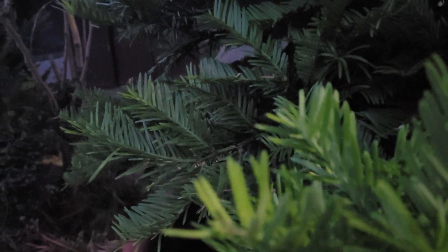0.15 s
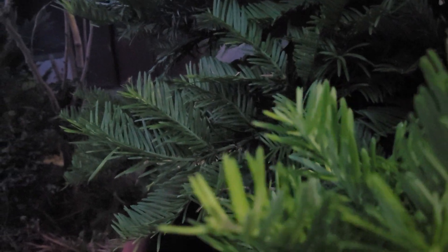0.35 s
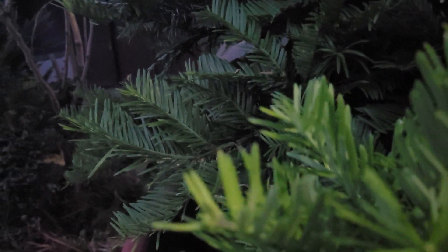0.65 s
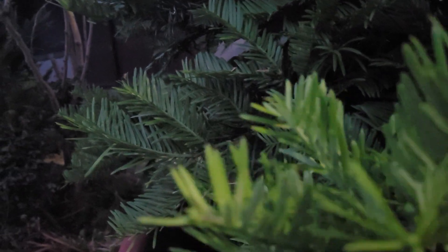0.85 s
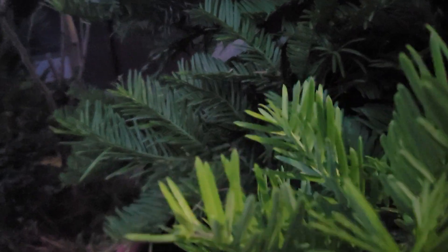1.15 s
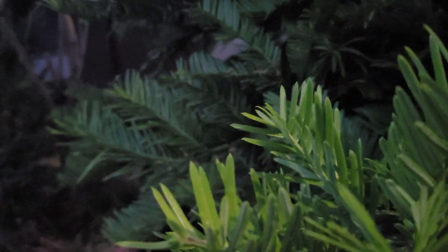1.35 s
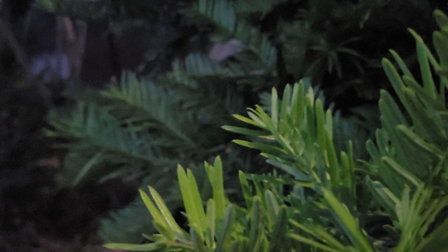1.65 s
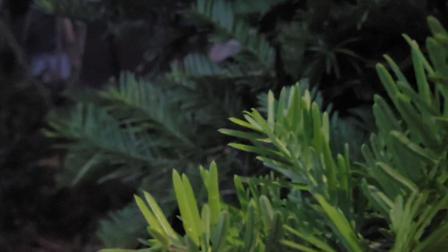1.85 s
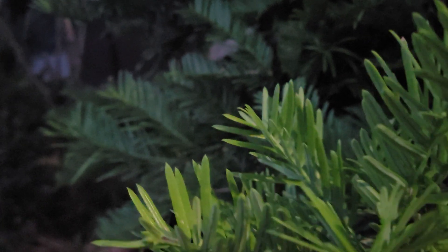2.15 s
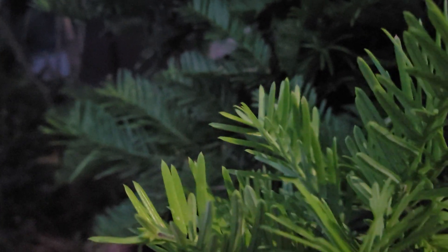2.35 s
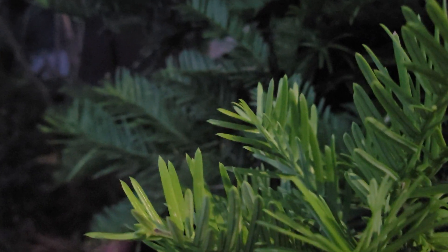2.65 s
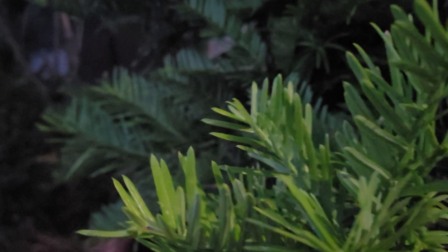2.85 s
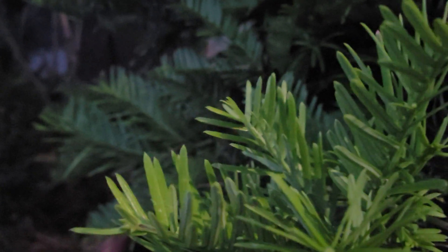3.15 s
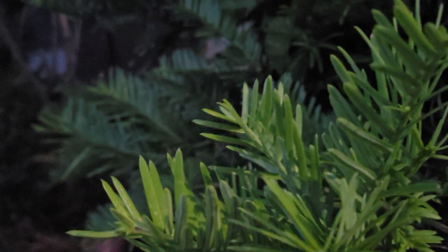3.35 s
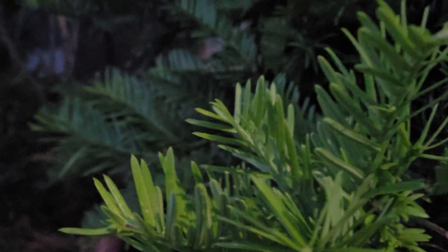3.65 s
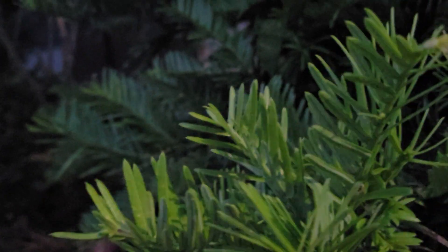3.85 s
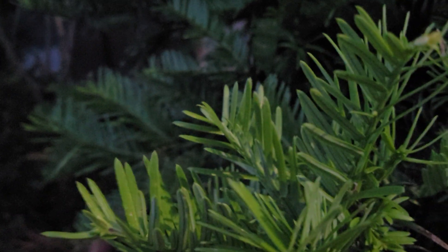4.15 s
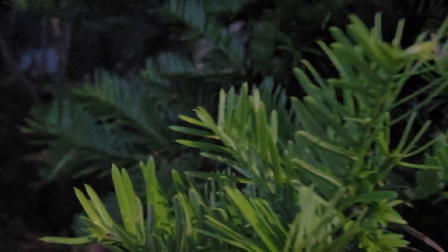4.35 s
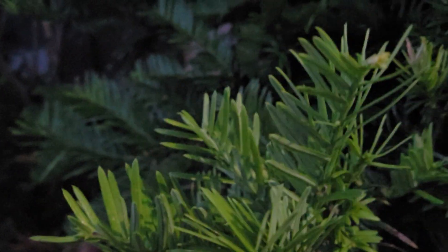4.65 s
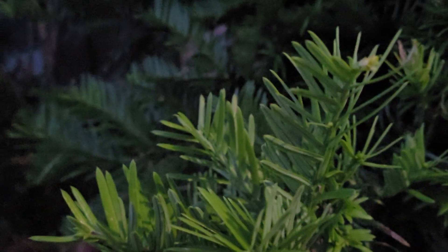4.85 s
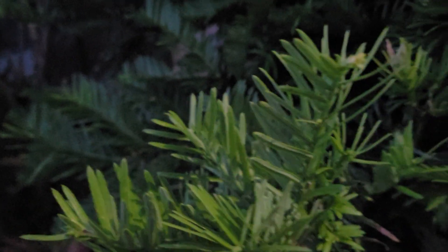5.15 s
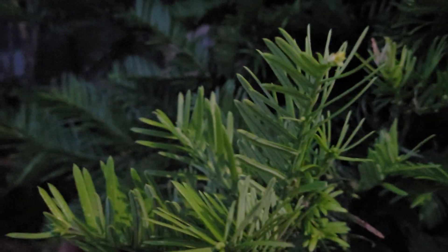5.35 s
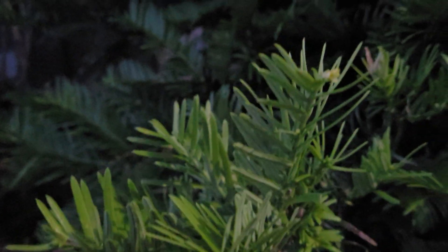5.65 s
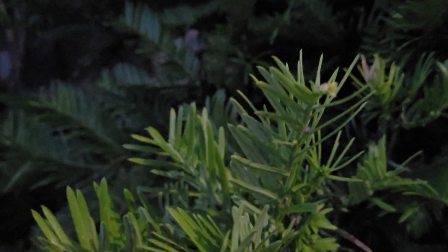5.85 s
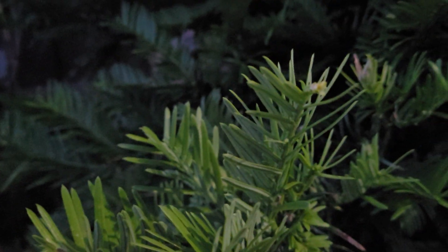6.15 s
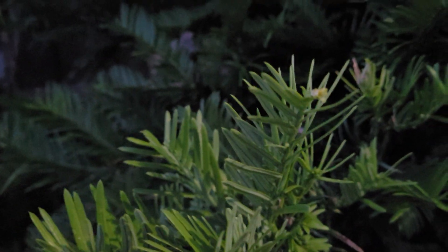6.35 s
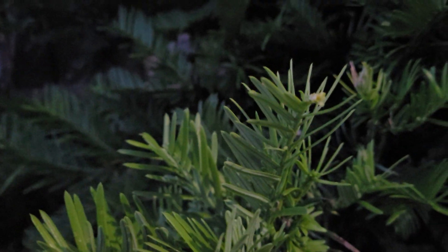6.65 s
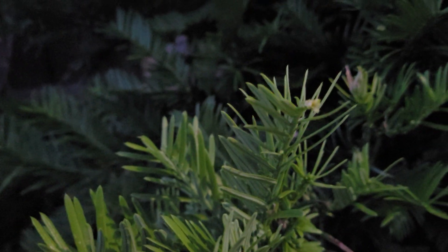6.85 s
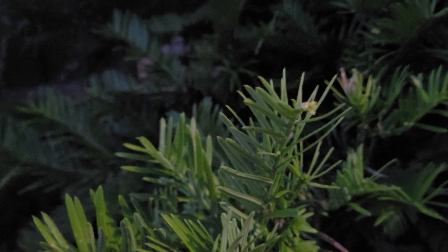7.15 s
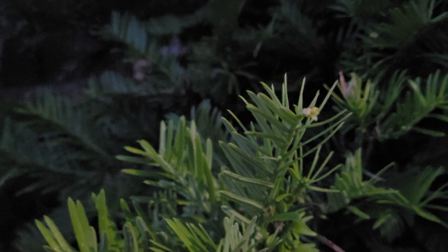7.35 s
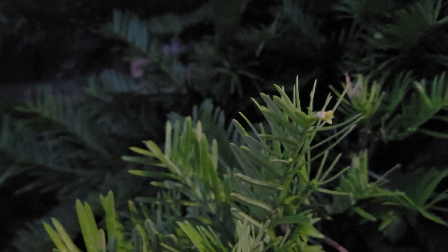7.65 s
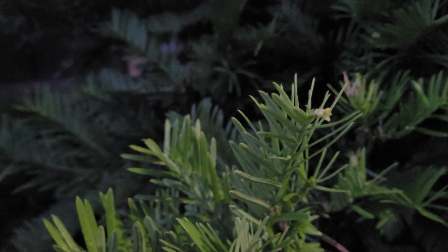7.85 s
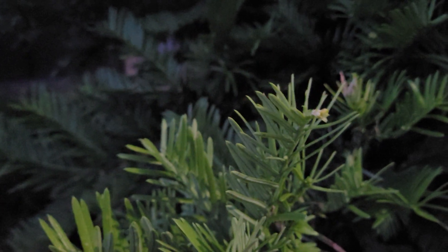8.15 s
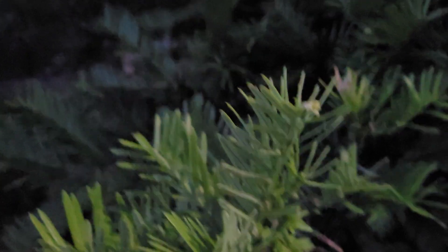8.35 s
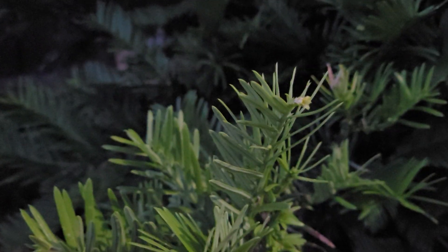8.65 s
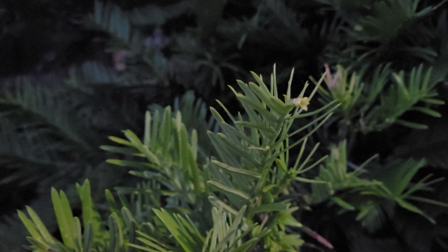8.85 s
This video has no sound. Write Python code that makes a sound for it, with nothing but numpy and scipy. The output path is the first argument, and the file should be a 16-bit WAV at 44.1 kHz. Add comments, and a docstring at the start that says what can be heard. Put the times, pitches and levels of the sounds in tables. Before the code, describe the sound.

One small tree frog calls very close and loud in a shrub at dusk, slightly right of a hand-held stereo microphone. Short, high, buzzy trills follow one another about four times a second from start to finish, each a quickening burst of tiny pulses rising slightly in pitch. Brief reflections from leaves and ground trail each note. A very quiet low rumble and hum lie far beneath.

```python
"""Yard shrub at dusk: a tree frog calls close by, to the right of a hand-held two-port microphone.
Each note is a quickening run of short throat pulses, summed from enveloped sines, one per vocal mode.
Discrete echoes and decaying noise tails stand for ground, leaves and yard.
Shaped noise gives the far rumble, faint chorus and low hum; the loudest pulses hit the limiter."""
import sys
import numpy as np
from scipy import signal
from scipy.fft import rfft, irfft
from scipy.io import wavfile
from scipy.ndimage import uniform_filter1d, minimum_filter1d

SR = 44100
rng = np.random.default_rng(int(sys.argv[2]) if len(sys.argv) > 2 else 0)


def unload_audio(sound):
    """Save the sound as a 16-bit wav file, at the path given as the first command line argument."""
    columns = np.transpose(np.atleast_2d(sound))
    # keep every value between -1 and 1, then stretch to whole-number steps
    steps = np.round(np.clip(columns, -1, 1) * 32767)
    wavfile.write(sys.argv[1], SR, steps.astype(np.int16))


N = 396900


def undb(db):
    """Amplitude gain of a level in dB."""
    return 10 ** (np.asarray(db) / 20)


def along(table, x, log=False):
    """Interpolate every column after the first at x, on a linear or log axis."""
    first, *columns = np.transpose(table)
    if log:
        first, x = np.log(first), np.log(x)
    return [np.interp(x, first, column) for column in columns]


def shaped_noise(spectrum_gain, likeness):
    """Stereo noise of joint rms 1; the mid/side balance sets left-right correlation per frequency."""
    mid = rfft(rng.standard_normal(N)) * spectrum_gain * np.sqrt(1 + likeness)
    side = rfft(rng.standard_normal(N)) * spectrum_gain * np.sqrt(1 - likeness)
    pair = irfft(np.array([mid + side, mid - side]), N)
    return pair / np.sqrt(np.mean(pair ** 2))


# background spectrum: (frequency [Hz], relative density [dB per Hz])
DUSK_SPECTRUM = [(18, -14), (70, 2), (130, -10), (230, -16.5), (320, -9.5), (420, -19), (540, -40),
                 (1350, -32), (2000, -39), (2950, -27), (3700, -41.5), (5400, -42.5), (6800, -43.5),
                 (16000, -57.5)]
# left-right correlation: (frequency [Hz], likeness [-1 to 1])
LIKENESS = [(60, .76), (125, .72), (250, .35), (500, -.3), (2000, -.4), (4500, 0)]
# hum bands: (centre [Hz], width [Hz], rms level before swell [dB])
HUM_BANDS = [(61.5, 12, -58.5), (318, 87, -64)]
# far rumble, only departures from each mean count: (time [s], bass level [dB], low-middle level [dB])
RUMBLE_SWELL = [(0.0, -60.5, -63), (0.02, -53.5, -65), (1.73, -58, -66), (2.58, -58.5, -59.5),
                (2.68, -57, -64.5), (4.36, -58, -63), (4.66, -50.5, -66.5), (4.81, -57.5, -60.5),
                (8.4, -57.5, -68), (9.0, -57.5, -63)]
DUSK_RMS_DB = -57  # before swell
SPLIT_HZ, RUMBLE_TOP_HZ = 190, 520


def dusk():
    """Far rumble and chorus plus two narrow noise hums; bass and low middle swell apart."""
    hz = np.maximum(np.fft.rfftfreq(N, 1 / SR), 1)
    likeness = along(LIKENESS, hz, log=True)[0]
    spectrum_db = along(DUSK_SPECTRUM, hz, log=True)[0]
    floor = undb(DUSK_RMS_DB) * shaped_noise(undb(spectrum_db), likeness)
    for centre_hz, width_hz, rms_db in HUM_BANDS:
        resonance = 1 / (1 + (2 * (hz - centre_hz) / width_hz) ** 2)
        floor += undb(rms_db) * shaped_noise(resonance, likeness)

    spectrum = rfft(floor)
    bass = irfft(spectrum / (1 + (hz / SPLIT_HZ) ** 6), N)
    rumble = irfft(spectrum / (1 + (hz / RUMBLE_TOP_HZ) ** 6), N)
    bass_db, middle_db = along(RUMBLE_SWELL, np.arange(N) / SR)
    swollen_bass = bass * undb(bass_db - bass_db.mean())
    swollen_middle = (rumble - bass) * undb(middle_db - middle_db.mean())
    return swollen_bass + swollen_middle + floor - rumble


# near echoes re direct sound: (delay [ms], left level [dB], right level [dB])
NEAR_ECHOES = [(1.1, -13, -24), (2.2, -10, -19), (3.1, -12, -20), (4, -14, -14), (6.5, -21, -23),
               (11, -27, -27)]
# scatter from shrub, yard and beyond: (level before low-pass [dB], t60 [s], low-pass corner [Hz])
SCATTER_TAILS = [(-15, 0.092, 19000), (-26.5, 0.32, 8200), (-44, 0.63, 2300)]


def garden(dry, onset_ms=2.0):
    """Convolve with near echoes and noise tails of staged decay: far scatter lasts longer, duller."""
    t = np.arange(SR) / SR
    response = np.zeros((2, SR))
    response[:, 0] = 1
    for delay_ms, left_db, right_db in NEAR_ECHOES:
        response[:, int(delay_ms * SR / 1000)] += undb([left_db, right_db])
    fade_in = np.clip(1000 * t / onset_ms - 1, 0, 1)  # silent for onset_ms, then ramps for onset_ms
    for level_db, t60_s, top_hz in SCATTER_TAILS:
        tail = rng.standard_normal((2, SR)) * undb(-60 * t / t60_s) * fade_in
        tail *= undb(level_db) / np.sqrt(np.sum(tail ** 2, axis=1, keepdims=True))
        response += signal.lfilter(*signal.butter(1, top_hz, fs=SR), tail)
    return signal.fftconvolve(dry, response, axes=1)[:, :N]


# notes: (third pulse time [s], pulse count setting the final fade [pulses],
#         note level [dB], second pulse effort [dB])
FROG_NOTES = [(0.0627, 15.6, -1.1, -22), (0.2763, 16.1, -0.9, -23.4), (0.4905, 15.6, -1, -21.5),
              (0.7037, 16, -0.9, -19.5), (0.9744, 15.6, 0, -15.2), (1.2297, 16.2, 0.2, -13.4),
              (1.4488, 15.9, -0.1, -15), (1.6994, 15.8, -0.7, -9.5), (1.9204, 15.8, -1, -12.4),
              (2.1581, 15.6, -0.1, -12.7), (2.4019, 16, -0.7, -9), (2.6029, 16.3, -0.1, -21.6),
              (2.8176, 16.1, 0.4, -18.6), (3.0278, 15.7, -0.3, -18.2), (3.2575, 15.7, -0.6, -9.3),
              (3.4943, 15.7, -0.5, -13.1), (3.705, 15.9, -0.8, -16.7), (3.9139, 16.3, -0.6, -16),
              (4.1883, 16.3, -0.2, -11.3), (4.4593, 15.9, -1.2, -9.7), (4.8448, 15.5, -0.1, -9.6),
              (5.0559, 15.9, -1.8, -6.7), (5.2608, 16, -1.4, -17.1), (5.4714, 15.9, -1, -16),
              (5.6829, 16, -1.5, -17.3), (5.9068, 16.1, -1.5, -11.1), (6.146, 15.8, -0.8, -11.2),
              (6.3868, 16, -1.4, -10.8), (6.5934, 15.7, -0.8, -17.8), (6.8061, 15.8, -0.8, -19.3),
              (7.032, 15.7, -1, -12.7), (7.2428, 16.3, -1.6, -16.7), (7.4867, 16.1, -0.3, -13.3),
              (7.7001, 15.7, -0.5, -17.4), (7.9552, 16.2, -0.9, -11.7), (8.1614, 16, -1.3, -19.6),
              (8.4309, 16.5, -1, -12.3)]
# faint first pulse: gap to second, level re second, pitch factor
TICK_GAP_MS, TICK_DB, TICK_PITCH = 10.2, -20, 1.03
# second-to-third gap, longer after a stronger second pulse
LEAD_MS, LEAD_MS_PER_DB = 8.5, .045
# later gaps: base, shortening per pulse, extra at start and its decay in pulses
GAP_MS, QUICKEN_MS, SLOW_START_MS, SLOW_START_PULSES = 6.11, .09, .92, 2.1
PACE_SPREAD = .005  # sd of the gap factor per note
# effort arch: peak, its pulse, dB per pulse squared, soft-start depth and its decay in pulses
PEAK_DB, PEAK_PULSE, ARCH_DB, SOFT_START_DB, SOFT_START_PULSES = 1.3, 5.8, .05, -5.5, 1.5
# tightening sac: pitch factor at third pulse, rise, pulses to rise, curve exponent
START_PITCH, RISE, RISE_PULSES, RISE_BEND = .984, .09, 5.0, 1.1
FADE_DB = 4.5  # times pulses squared at the note end


def pulses(jitter_ms=.04, scatter_db=.5, waver=.003):
    """Time, level, effort and pitch per pulse: gaps shorten, effort arches, the sac tightens."""
    k = np.arange(18)  # from the third pulse on
    gap_ms = GAP_MS - QUICKEN_MS * k + SLOW_START_MS * np.exp(-k / SLOW_START_PULSES)
    arch_db = PEAK_DB - ARCH_DB * (k - PEAK_PULSE) ** 2
    arch_db += SOFT_START_DB * np.exp(-k / SOFT_START_PULSES)
    rising_pitch = START_PITCH + RISE * (1 - np.exp(-(k / RISE_PULSES) ** RISE_BEND))
    pitch = np.r_[TICK_PITCH, 1, rising_pitch]
    number = np.arange(len(pitch))
    rows = []
    for third_s, count, level_db, second_db in FROG_NOTES:
        time_draw, effort_draw, pitch_draw = rng.standard_normal((3, len(number)))
        lead_ms = LEAD_MS + LEAD_MS_PER_DB * second_db
        pace = 1 + PACE_SPREAD * rng.standard_normal()
        gaps_ms = np.r_[TICK_GAP_MS, lead_ms, gap_ms * pace]
        from_third_ms = np.cumsum(gaps_ms) - gaps_ms - TICK_GAP_MS - lead_ms
        at_s = third_s + (from_third_ms + jitter_ms * time_draw) / 1000
        effort_db = np.r_[second_db + TICK_DB, second_db, arch_db] + scatter_db * effort_draw
        # air runs out: last pulses shrink ever faster
        fade_db = FADE_DB * np.clip(number - count + 1.9, 0, None) ** 2
        levels_db = np.full(len(number), level_db)
        rows += zip(at_s, levels_db, effort_db - fade_db, pitch + waver * pitch_draw)
    return np.transpose(rows)


# sac and throat modes, all three tables: (frequency before pitch factor [Hz], relative level [dB],
#   envelope peak [ms], rise [ms], fall [ms], growth with effort [dB/dB], left phase [rad])
LOW_MODES = [(811, -18, 1.5, 4.5, 4.1, 0.8, -0.32), (1296, 6.5, 2.31, 1.815, 1.184, 0.79, -0.13),
             (1468.6, 4.5, 2.25, 1.22, 0.98, 0.98, 0.063), (1740.4, -3, 2.58, 0.81, 1.7, 1, 0.59),
             (2341, -4.5, 2.2, 3.1, 3.4, 0.86, 0.6)]
SAC_MODE = [(2865, 0.1, 1.9, 1.35, 1.7, 1.01, 0.01)]
OVERTONE_MODES = [(3272, -20, 0.73, 3.3, 1.84, 0.51, 0.075), (4137, -35, 2.3, 1.4, 2.5, 0.58, .1),
                  (4320, -29, 1.7, 2.4, .9, 2.8, 0.2), (5090, -43.5, 1.5, 0.81, 1.5, 0.91, 0.14),
                  (6090, -44, 1.3, 0.98, 0.55, 0.71, 0.17), (6900, -43.5, 1.3, 0.47, 0.82, 0.71, .1),
                  (7770, -32.5, 3.07, .6, 0.52, 1.3, 0.29), (8520, -39, 1.3, 0.36, 0.4, 1.7, 0.27),
                  (10080, -52.5, 1.8, 1, 1.1, 1.5, .1), (11820, -62.5, 2.1, .8, .8, 1.7, .1),
                  (14200, -70, 2.1, .6, .6, 1.5, .1)]
# slow hand turn: (time [s], left lag [ms], left gain [dB], both-port gain [dB])
HAND_TURN = [(0, .46, 0, .3), (3, .45, 0, .3), (4.5, .415, 0, 0), (6, .375, .7, -.4), (9, .345, 2, -1.3)]
# casing shades left port: (frequency [Hz], left minus right [dB])
CASING_SHADE = [(780, -5), (1200, -.8), (2000, -2.5), (2900, -6.8), (4300, -4), (6000, -4.5), (8300, -10),
                (12000, -5)]
# beamed overtones: (time [s], gain [dB])
OVERTONE_AIM = [(0, -1.5), (2.5, -2.5), (3.6, -0.8), (4.3, -0.9), (5.2, 1), (6.2, .4), (9, -1)]
LOW_DB, LOW_FULL_DB = -20.5, -8  # low voice: same level every note; no growth above this effort
LOW_TURN = .75  # share of lag change felt by long waves bending round the casing
LOW_LEFT = -1.1  # low voice left gain, dB per dB of HAND_TURN left gain
BODY_HZ, ONSET_MS = 811, 0.3  # small-body high-pass; opening time of the cords


def pulse_envelope(ms, peak_ms, rise_ms, fall_ms):
    """Cords open abruptly, then the mode swells and dies with unequal Gaussian flanks."""
    opening = np.sin(np.pi / 2 * np.clip(ms / ONSET_MS, 0, 1)) ** 2
    width_ms = np.where(ms < peak_ms, rise_ms, fall_ms)
    return opening * np.exp(-((ms - peak_ms) / width_ms) ** 2)


def frog(loose_rad=.14, flutter_db=.45):
    """Each pulse rings every sac and throat mode; the left port hears it later and shaded."""
    at_s, level_db, effort_db, pitch = (column[:, None] for column in pulses())
    lag_ms, left_db, both_db = along(HAND_TURN, at_s)
    aim_db = along(OVERTONE_AIM, at_s)[0]
    out = np.zeros((2, N + 1000))
    place = np.floor(at_s * SR).astype(int) + np.arange(400)
    since_pulse_ms = (place - at_s * SR) * 1000 / SR

    low_effort_db = np.minimum(effort_db - LOW_FULL_DB, 0)
    start_lag_ms = HAND_TURN[0][1]
    low_lag_ms = start_lag_ms + LOW_TURN * (lag_ms - start_lag_ms)
    voices = (
        (LOW_MODES, LOW_DB, low_effort_db, low_lag_ms, LOW_LEFT * left_db),
        (SAC_MODE, level_db, effort_db, lag_ms, left_db),
        (OVERTONE_MODES, level_db + aim_db, effort_db, lag_ms, left_db),
    )
    sac_hz = SAC_MODE[0][0]
    for modes, voice_db, push_db, left_lag_ms, port_db in voices:
        for hz, mode_db, peak_ms, rise_ms, fall_ms, growth, left_rad in modes:
            # modes further above the sac tone repeat less from pulse to pulse
            spread = 1 + max(hz - sac_hz, 0) / 600
            level_draw, phase_draw, left_draw = rng.standard_normal((3, len(at_s), 1)) * spread
            size_db = mode_db + voice_db + both_db + growth * push_db + flutter_db * level_draw
            shade_db = along(CASING_SHADE, hz, log=True)[0] + port_db
            left = (left_lag_ms, shade_db, left_rad + loose_rad * left_draw / 2)
            right = (0, 0, 0)
            for side, (port_lag_ms, side_db, shift_rad) in enumerate((left, right)):
                ms = since_pulse_ms - port_lag_ms
                phase = 2 * np.pi * hz * pitch * ms / 1000 + loose_rad * phase_draw + shift_rad
                wave = pulse_envelope(ms, peak_ms, rise_ms, fall_ms) * np.sin(phase)
                wave = undb(size_db + side_db) * wave
                out[side] += np.bincount(place.ravel(), wave.ravel(), N + 1000)
    body = signal.butter(6, BODY_HZ, "high", fs=SR, output="sos")
    return signal.sosfilt(body, out[:, :N])


def scene():
    """Evening floor plus the frog in its garden."""
    return dusk() + garden(frog())


CEILING, HOLD_MS = .96, 1.2  # full-scale fraction before the top cut; look-ahead
TOP_HZ = 15800


def record(dry):
    """Look-ahead limiter holds each channel under the ceiling; an elliptic low-pass cuts the top."""
    hold = int(HOLD_MS * SR / 1000)
    needed_gain = CEILING / np.maximum(np.abs(dry), CEILING)
    held_gain = minimum_filter1d(needed_gain, 2 * hold + 1)
    gain = uniform_filter1d(uniform_filter1d(held_gain, hold), hold)
    top_cut = signal.ellip(8, .2, 70, TOP_HZ, fs=SR, output="sos")
    return signal.sosfilt(top_cut, gain * dry)


dry = scene()
out = record(dry)
unload_audio(out)
```